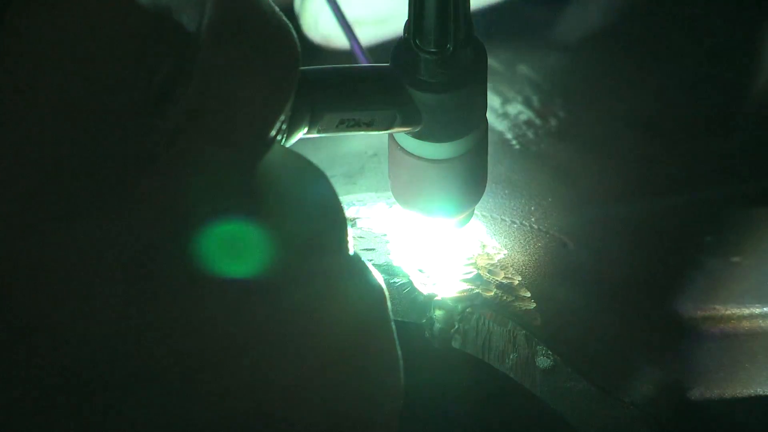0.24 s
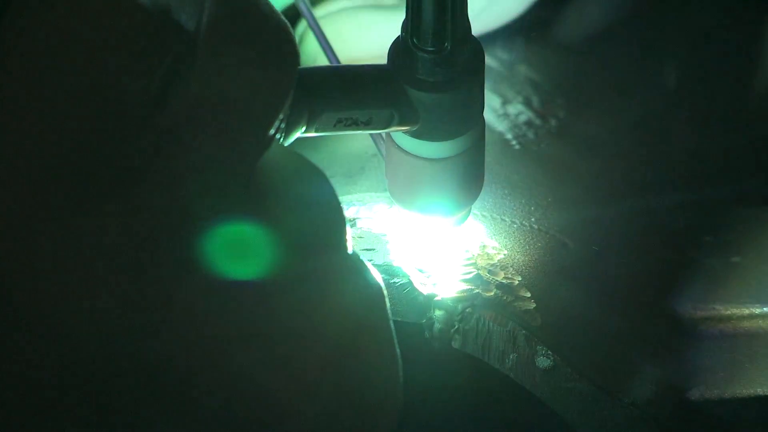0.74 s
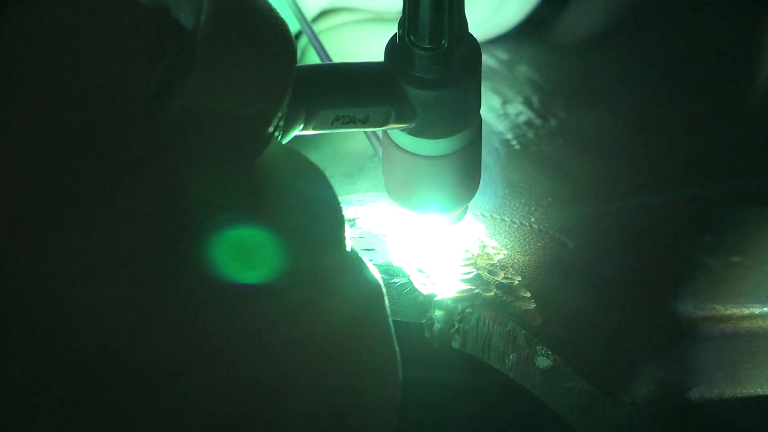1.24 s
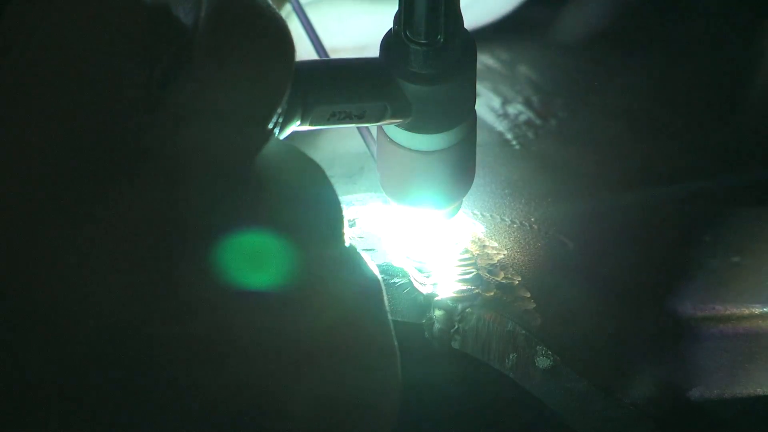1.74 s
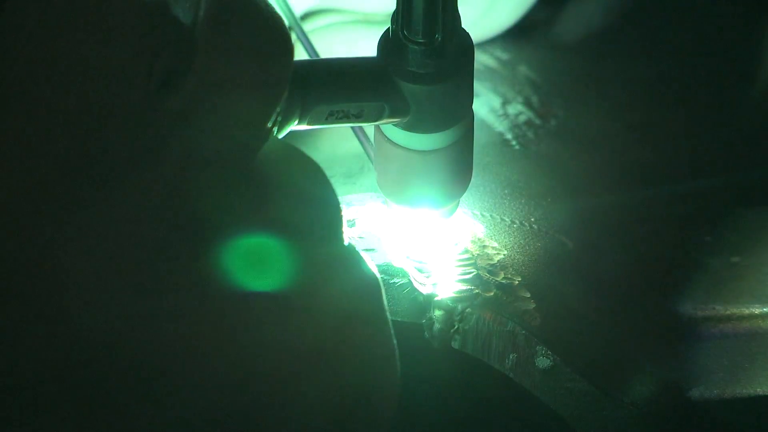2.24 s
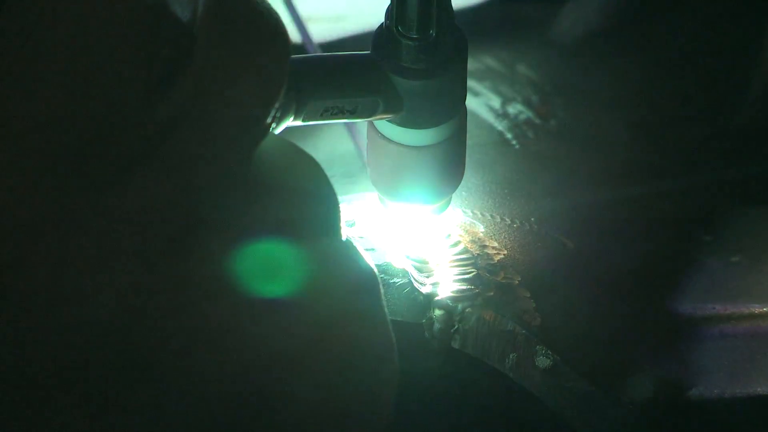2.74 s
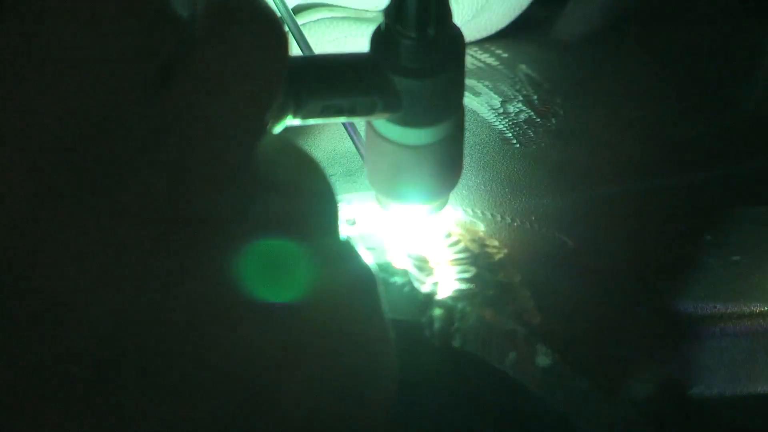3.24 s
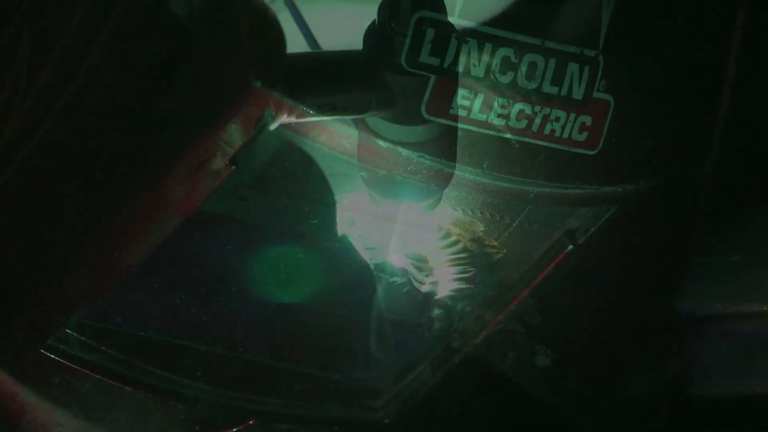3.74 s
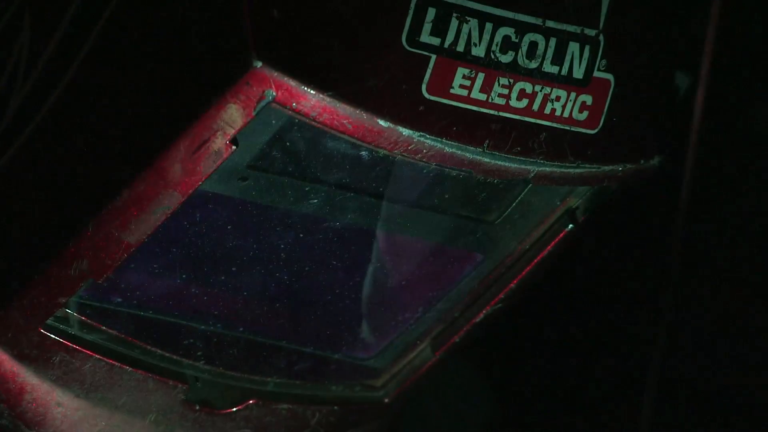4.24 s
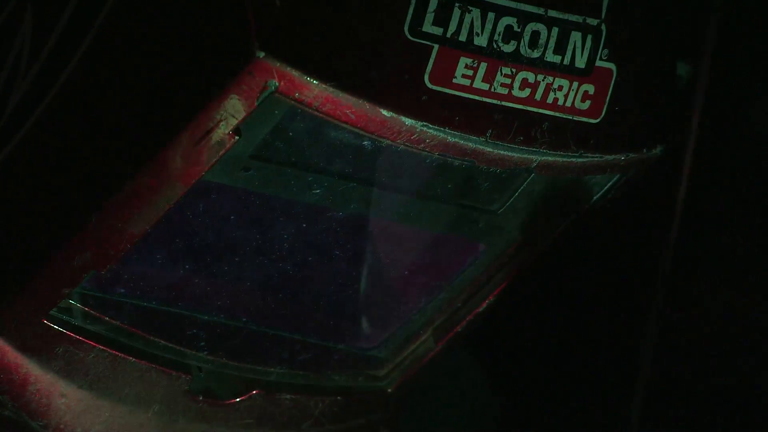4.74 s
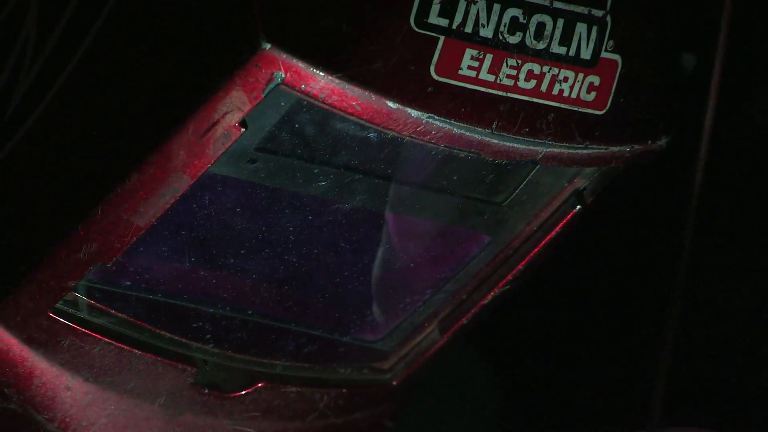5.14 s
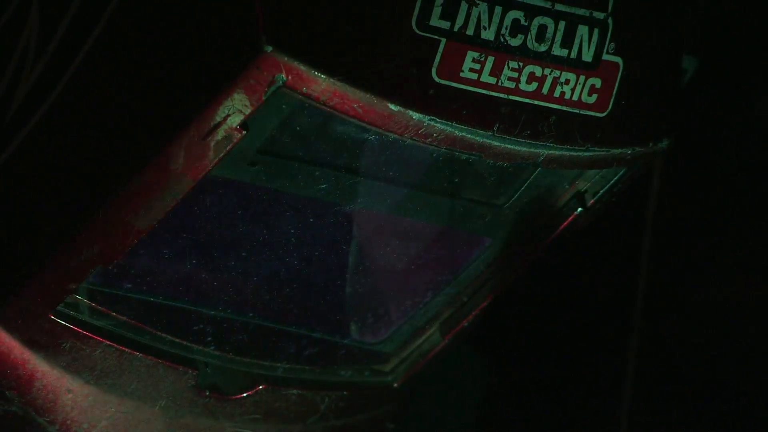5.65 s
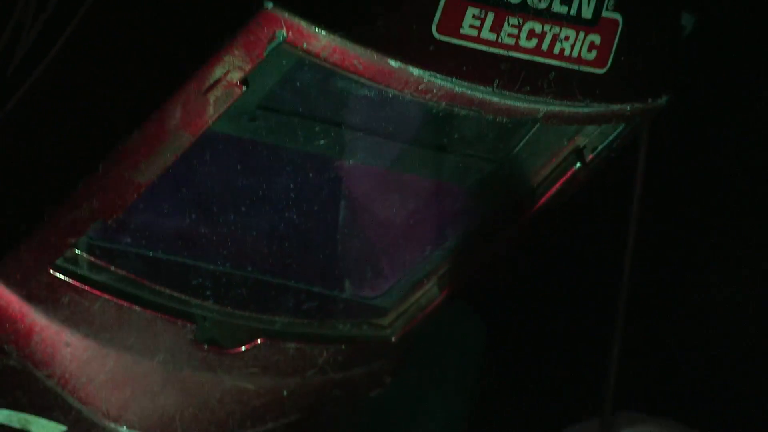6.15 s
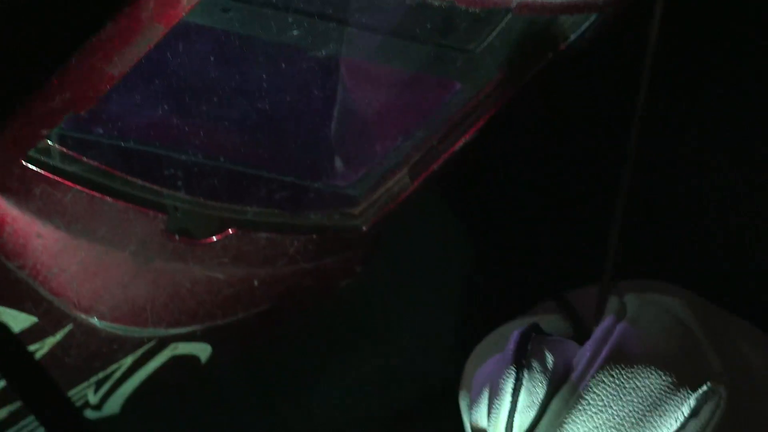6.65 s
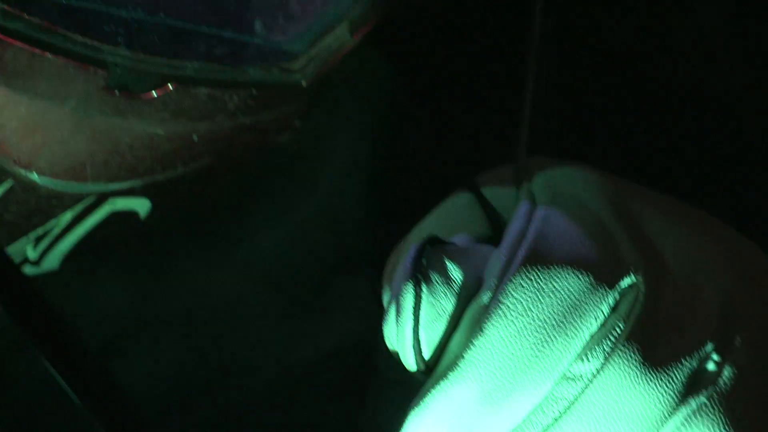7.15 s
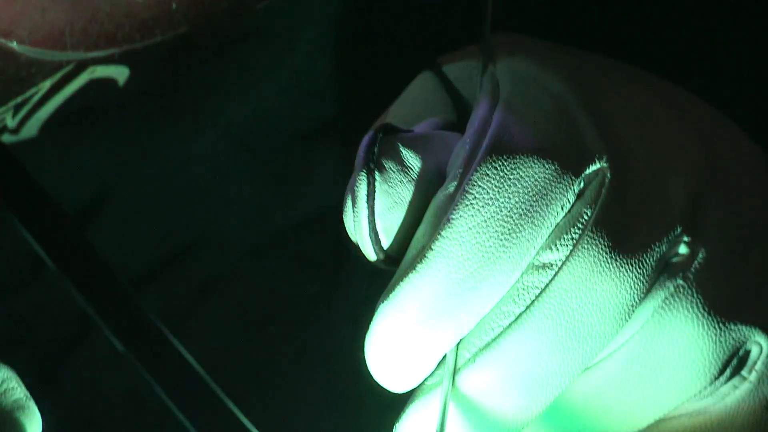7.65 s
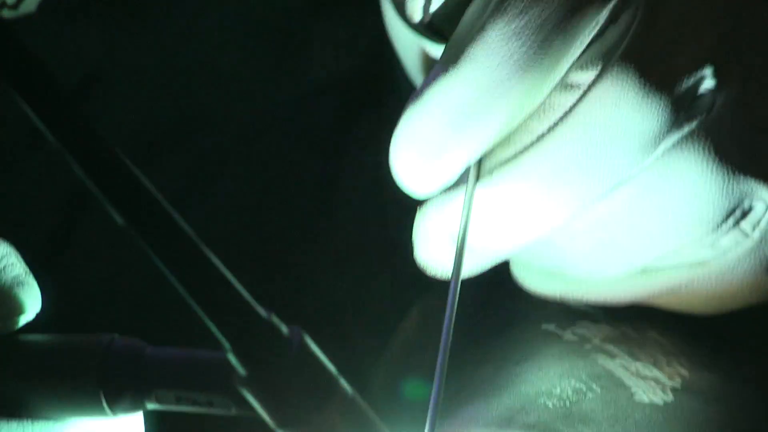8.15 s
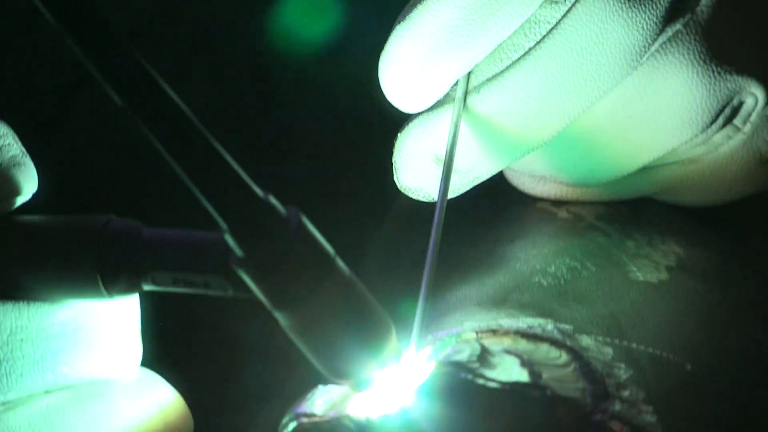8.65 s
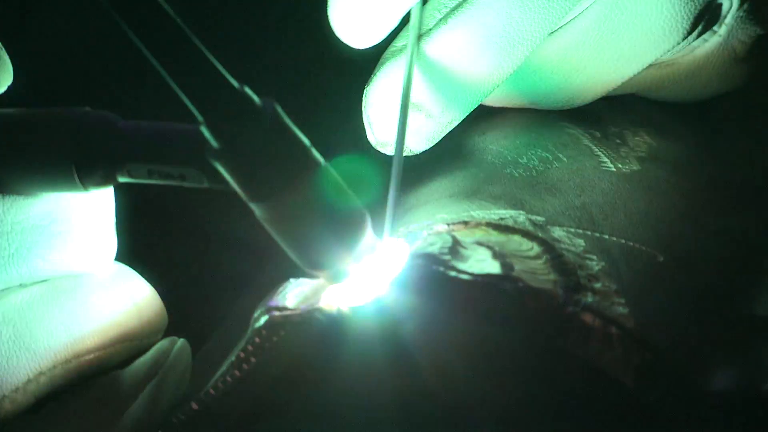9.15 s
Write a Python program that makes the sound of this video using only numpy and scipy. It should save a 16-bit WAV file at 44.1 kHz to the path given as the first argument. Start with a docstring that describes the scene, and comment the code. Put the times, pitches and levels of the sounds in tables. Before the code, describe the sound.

In a small dry workshop, a welding arc holds a constant low, raspy buzz with bright sizzle. Dull little pops sputter from the molten pool in irregular bouts. The close microphone seems to be beside the torch first, then blends smoothly to a place by the welder's helmet, where the buzz turns brighter and more uneven. Pops grow rougher towards the end.

```python
"""AC TIG arc in a workshop

An arc buzzes on a metal workpiece, heard beside the torch, then beside the welder's helmet in a crossfade.
Clicks at both polarity changes of every cycle, plus noise fizz, pass through echoes, resonances and registers.
Filtered pulses make the pool's dull pops: small puffs loosely follow the cycles, loud pops have listed times.
Shaped noise makes the air and the room tail; short decaying sines make soft bumps on the microphone's mount."""
import sys
import numpy as np
from scipy import signal
from scipy.fft import rfft, irfft, next_fast_len
from scipy.io import wavfile
from scipy.ndimage import map_coordinates

SR = 44100
rng = np.random.default_rng(int(sys.argv[2]) if len(sys.argv) > 2 else 0)


def inscribe(sig):
    """Save sig as 16-bit PCM at rate SR to the path in sys.argv[1].

    A 1-D sig is mono; a 2-D sig holds one channel per row.
    Samples are clipped to [-1, 1] before scaling.
    """
    pcm = np.round(np.clip(np.atleast_2d(sig).T, -1, 1) * 32767)
    wavfile.write(sys.argv[1], SR, pcm.astype(np.int16))


N = 414099
TIME = np.arange(N) / SR
GRID_HZ = np.maximum(np.fft.rfftfreq(8192, 1 / SR), 1)
ARC_HZ = 116.172


def from_db(db):
    """Decibels to gain."""
    return 10 ** (np.asarray(db) / 20)


def rms_one(x):
    """Scale to an rms of 1."""
    return x / np.sqrt(np.mean(x ** 2) + 1e-20)


def curves(rows, times):
    """Interpolate each column of a table at the given times."""
    s, *columns = np.transpose(rows)
    return [np.interp(times, s, column) for column in columns]


def spectrum_db(points):
    """Join (Hz, dB) points on a log-frequency axis."""
    hz, db = np.transpose(points)
    return np.interp(np.log(GRID_HZ), np.log(hz), db)


def butter(x, hz, kind, order):
    """Causal Butterworth low- or high-pass."""
    sos = signal.butter(order, min(hz, .45 * SR), kind, fs=SR, output="sos")
    return signal.sosfilt(sos, x + 1e-18)


def wander(times, per_s):
    """Smooth random curve through normal knots of spread 1, per_s knots a second."""
    knots = rng.standard_normal(1024)
    return map_coordinates(knots, [times * per_s], order=3, mode="wrap")


def swell(at_s, width_s):
    """Gaussian rise to 1 and back."""
    return np.exp(-((TIME - at_s) / width_s) ** 2)


def response(db):
    """Minimum-phase impulse response of a dB curve, with unit energy."""
    cepstrum = irfft(np.log(from_db(db)))
    half = len(cepstrum) // 2
    # fold the cepstrum to make it causal
    cepstrum[1:half] *= 2
    cepstrum[half + 1:] = 0
    impulse = irfft(np.exp(rfft(cepstrum)))[:half]
    return impulse / np.linalg.norm(impulse)


def through(x, impulse):
    """Convolve with an impulse response."""
    return signal.fftconvolve(x, impulse)[:N]


def clicks(times, sizes, size=N):
    """Sharp clicks, placed between samples by a windowed sinc."""
    at = np.asarray(times)[:, None] * SR
    taps = np.floor(at).astype(int) + np.arange(-5, 7)
    shape = np.sinc(taps - at) * np.sinc((taps - at) / 6)
    weights = shape * np.asarray(sizes)[:, None]
    inside = (taps >= 0) & (taps < size)
    return np.bincount(taps[inside], weights[inside], size)


def workshop_air():
    """Workshop air and shielding gas: steady coloured noise."""
    # Each row: frequency in Hz, relative density in dB per Hz.
    air_colour = [(20, -9), (50, -6.5), (90, -6.5), (250, -5), (1000, -5), (4000, -10), (16000, -16.5)]
    level_db = -45
    return from_db(level_db) * through(rng.standard_normal(N), response(spectrum_db(air_colour)))


def workshop(x):
    """Far walls return a faint, dull, diffuse tail: decaying noise as impulse response."""
    t60_s, room_db = .3, -21
    age = TIME[:SR // 2]
    decay = from_db(-60 * age / t60_s) * (age > .006)
    tail = butter(rng.standard_normal(len(age)) * decay, 7400, "low", order=1)
    return from_db(room_db) * through(x, tail / np.linalg.norm(tail))


def bumps(hz, t60_s):
    """Each soft bump rings the microphone's mount briefly as a decaying sine."""
    # Each row: start in seconds, starting amplitude of the ring in dB.
    mount_bumps = [(6.128, -46), (6.168, -44), (6.27, -48), (6.37, -45)]
    bump_s, bump_db = np.transpose(mount_bumps)
    age = TIME[:SR // 2]
    ring = np.sin(2 * np.pi * hz * age) * from_db(-60 * age / t60_s)
    return through(clicks(bump_s, from_db(bump_db)), ring)


def sputter(times):
    """Gain of the pool's puffs: each bout builds up, holds and dies away; 0 between bouts."""
    # Each row: bout start in seconds, end in seconds, puff gain in dB ahead of the place's own gain.
    bouts = [(0.213, 0.65, -43.5), (1.21, 1.535, -46), (1.55, 1.81, -43), (1.96, 2.04, -49),
             (2.507, 3.048, -44.5), (3.172, 3.41, -46.5), (3.623, 3.855, -42.5), (4.11, 4.673, -44),
             (4.86, 5.252, -38), (5.917, 6.27, -39.5), (6.412, 6.6, -39.5), (7.31, 7.653, -39),
             (7.88, 8.084, -39), (8.245, 8.364, -36.5), (8.846, 8.91, -33), (9.142, 9.282, -32)]
    edge_s = 0.054
    gain = 0
    for start, end, db in bouts:
        edge = np.minimum(times - start, end - times) / edge_s
        gain = gain + from_db(db) * np.clip(edge + .5, 0, 1)
    return gain


def unrest(times):
    """Restlessness of the pool: 0 when calm, 1 at the puff gain of a full bout, more in the hardest."""
    full_bout_db = -36.5
    return sputter(times) / from_db(full_bout_db)


def pool(cycles, colour, calm_db, sputter_db, loud_db, spread_db, outward, scatter_s):
    """Small puffs come about a millisecond into each cycle, at times in a hard run; loud pops at listed times."""
    # Each row: start in seconds, level over one cycle in dB ahead of loud_db and the dulling.
    loud_pops = [(0.015, -31), (0.23, -36), (0.566, -36), (1.219, -33), (1.289, -31), (1.461, -35),
                 (1.616, -35), (1.685, -34), (1.736, -34), (2.02, -35), (2.597, -35), (2.726, -35),
                 (2.778, -33), (2.872, -35), (2.907, -32), (3.027, -35), (3.243, -34), (3.388, -31),
                 (3.699, -35), (4.446, -31), (4.601, -33), (5.955, -32), (6.021, -32), (6.039, -31),
                 (6.125, -33), (6.219, -31), (6.417, -33), (7.339, -29), (7.528, -29), (7.614, -29),
                 (7.743, -29), (7.906, -31), (7.932, -30), (7.993, -30), (8.173, -30), (8.845, -31),
                 (8.871, -32), (9.284, -31)]
    runs_per_s = 45   # runs of two or three cycles
    repeat_gain = 0.17   # a loud pop comes again one cycle later
    count = len(cycles)
    runs = from_db(spread_db * np.tanh(wander(cycles, runs_per_s)))
    sizes = rms_one((outward + rng.standard_normal(count)) * runs)
    sizes = 3 * np.tanh(sizes / 3)
    sizes = sizes * np.hypot(from_db(calm_db), from_db(sputter_db) * sputter(cycles))
    puffs = clicks(cycles + 0.00093 + scatter_s * rng.standard_normal(count), sizes)
    pop_s, pop_db = np.transpose(loud_pops)
    pop_sizes = from_db(pop_db + loud_db)
    pops = clicks(pop_s, pop_sizes) + clicks(pop_s + 1 / ARC_HZ, repeat_gain * pop_sizes)
    dulled = butter(butter(puffs + pops, 2900, "low", order=2), 75, "high", order=2)
    # the root turns click size into rms over one cycle
    return through(dulled, response(spectrum_db(colour))) * np.sqrt(SR / ARC_HZ)


def snaps(cycles, reverse_s, reverse_gain, calm_flutter_db, bout_flutter_db):
    """Two snaps a cycle: a round one as the electrode turns positive, a thin one as it turns back."""
    root_drift_s, root_jitter_s_per_db = 1e-5, 3e-6
    fizz_decay_s, fizz_db = .0022, -16.5
    count = len(cycles)
    # strength spreads more while the pool is restless
    flutter_db = calm_flutter_db + bout_flutter_db * unrest(cycles)
    chance = 0.69 * wander(cycles, per_s=60) + 0.37 * rng.standard_normal((2, count))
    sizes = from_db(flutter_db * chance)
    # the arc root roams, so the second snap comes a little early or late
    late_s = root_drift_s * wander(cycles, per_s=2.054)
    late_s = late_s + root_jitter_s_per_db * flutter_db * rng.standard_normal(count)
    first = butter(clicks(cycles, sizes[0]), 7000, "low", order=1)
    second = clicks(cycles + reverse_s + late_s, reverse_gain * sizes[1])
    second = butter(second, 2500, "high", order=1)
    # oxide crackles away from the metal from the first snap on
    age = (TIME - cycles[0]) % (1 / ARC_HZ)
    fizz = butter(rng.standard_normal(N) * np.exp(-age / fizz_decay_s), 5800, "high", order=1)
    return -rms_one(first + second) + from_db(fizz_db) * rms_one(fizz)


def scatter(x, gain, size):
    """Bounces between two surfaces, size samples a round trip: an allpass spreads time, keeps colour."""
    loop = np.zeros(size + 1)
    loop[0], loop[-1] = 1, np.clip(gain, -.97, .97)
    return signal.lfilter(loop[::-1], loop, x)


def surroundings(x, colour, modes, echoes):
    """Short echoes and resonances of the work, gloves and helmet."""
    db = spectrum_db(colour)
    for hz, width_hz, gain_db in modes:
        db = db + gain_db / (1 + (2 * (GRID_HZ - hz) / width_hz) ** 2)
    delays_s, gains = np.transpose(echoes)
    echoed = x + through(x, clicks(delays_s, gains, size=512))
    return rms_one(butter(through(echoed, response(db)), 76, "high", order=2))


def glove(x, gain, delay_s, sway_s):
    """An echo off the moving hand, its delay swaying, makes the tone shift slowly."""
    delay = delay_s + sway_s * wander(TIME, per_s=1.747)
    return x + gain * map_coordinates(x, [(TIME - delay) * SR], order=3)


def bench(x, hand_echo_gain):
    """Longer bounces over the bench fill the pause between snaps; the welder's hand adds one more."""
    bounced = scatter(x, gain=0.95, size=113)
    return glove(bounced, hand_echo_gain, delay_s=0.000805, sway_s=.00006)


def play_buzz(x, registers, hum_db, boom_db):
    """The arc's force and the pool's unrest swell each register by its own share."""
    # Each row: time in seconds, force of the arc in dB, which rises and falls with its length.
    arc_force = [(0.0, -34), (0.13, -32.5), (1.31, -32), (1.44, -38), (1.67, -29.5), (2.14, -28),
                 (2.38, -34), (3.24, -29), (3.56, -36.5), (4.63, -32.5), (4.71, -34), (5.05, -29.5),
                 (5.36, -30), (5.7, -36.5), (5.73, -32.5), (5.88, -33), (5.93, -37), (6.49, -28.5),
                 (7.03, -31.5), (7.22, -34), (7.74, -31.5), (7.82, -33.5), (7.87, -31.5), (8.34, -29),
                 (9.07, -32), (9.26, -31.5), (9.34, -34), (9.39, -32)]
    # Edges in Hz between low hum, hum, hollow boom, growl, rasp, sizzle and top.
    edges_hz = (170, 405, 630, 1690, 3400, 11500)
    hz = np.fft.rfftfreq(2 * next_fast_len(N // 2 + 1), 1 / SR)
    whole = rfft(x, 2 * (len(hz) - 1))
    below = [0] + [1 / (1 + (hz / edge) ** 24) for edge in edges_hz] + [1]
    force_db, = curves(arc_force, TIME)
    swing_db = force_db - force_db.mean()
    restless = unrest(TIME)
    swells_db = (0, hum_db, boom_db, 0, 0, 0, 0)
    out = 0
    for low, high, (level_db, share, bout_db), swell_db in zip(below, below[1:], registers, swells_db):
        band = rms_one(irfft(whole * (high - low))[:N])
        out = out + band * from_db(level_db + share * swing_db + bout_db * restless + swell_db)
    return out


def beside_torch(beat):
    """Arc and pool from the torch; hum and boom dip briefly."""
    # Each row: frequency in Hz, relative level of the snaps in dB.
    snap_colour = [(116, -14), (232, -15.5), (400, 4.5), (900, -15), (1400, -12), (4000, -11.5),
                   (6000, -28), (9000, -15), (13000, -31), (16000, -33)]
    # Each row: resonance or dip in Hz, width in Hz, gain in dB.
    modes = [(574, 116, -10.2), (1055, 94, -9.0), (1159, 93, 5.9), (1393, 96, -15.0), (1558, 160, 10.4),
             (1732, 93, -6.7), (2248, 147, -13.2), (3841, 98, -10.5), (4374, 241, 8.0), (4868, 96, -7.5),
             (5536, 215, -6.9), (5696, 103, 6.5), (5929, 140, 4.0), (6510, 192, -9.6), (6962, 440, 5.5),
             (7536, 100, -7.0), (9125, 253, 5.7), (9403, 184, -6.3), (9924, 213, 8.3), (10564, 241, -5.9),
             (12337, 261, 5.9)]
    # Each row: echo delay in seconds, linear gain.
    echoes = [(0.000158, 0.5), (0.000851, 0.19), (0.002198, -0.15), (0.002823, -0.08)]
    # Each row: frequency in Hz, relative level of a pop in dB.
    pop_colour = [(60, -25.5), (200, -12), (290, -7.5), (390, 3.5), (460, -4.5), (570, -7), (720, 4.5),
                  (860, 0.5), (1030, -17.5), (1200, 0.5), (1400, -16.5), (1800, -9.5), (2500, -18.5),
                  (3300, -24.5)]
    # Each row, low hum to top: base level in dB, share of the arc's swing, dB added by a full bout.
    registers = [(-49.5, .1, 0.5), (-39, 0.16, 4), (-41, 0.21, 1.2), (-38.5, 0.2, 5.5), (-41, 0.21, 4),
                 (-35, 0.59, 1.5), (-46, 1, -2.5)]
    cycles = beat + .00517
    arc = snaps(cycles, reverse_s=.001711, reverse_gain=1.2, calm_flutter_db=0.52, bout_flutter_db=1.2)
    arc = surroundings(scatter(arc, gain=.74, size=13), snap_colour, modes, echoes)
    dip_db = -8.5 * swell(at_s=3.7, width_s=0.37)
    buzz = play_buzz(bench(arc, hand_echo_gain=.2), registers, hum_db=dip_db, boom_db=dip_db)
    return buzz + pool(cycles, pop_colour, calm_db=-51, sputter_db=2.5, loud_db=2.0,
                       spread_db=10.5, outward=1.0, scatter_s=0.0002)


def beside_helmet(beat):
    """Arc and pool from the helmet; the hollow boom swells once."""
    # Each row: frequency in Hz, relative level of the snaps in dB.
    snap_colour = [(116.0, -9), (232.0, -15), (400.0, 23.5), (900.0, -15), (1400.0, -9), (4000.0, -8.5),
                   (6000.0, -20), (9000.0, -12), (13000.0, -14.5), (16000.0, -26)]
    # Each row: resonance or dip in Hz, width in Hz, gain in dB.
    modes = [(406, 114, -7.1), (588, 146, -9.1), (1544, 137, 13.2), (2102, 97, 3.3), (2404, 117, 3.8),
             (3154, 333, -10.5), (3373, 104, 5.5), (3476, 105, -3.2), (4337, 198, 3.5), (4861, 163, -8.2),
             (5033, 135, 12.7), (5691, 93, 3.9), (6358, 150, 3.8), (6577, 194, -4.2), (6968, 90, -6.8),
             (9697, 325, 5.9), (10110, 356, -5.7), (11159, 271, -8.7), (11751, 139, -7.7),
             (12159, 181, 6.0), (12388, 242, -6.3)]
    # Each row: echo delay in seconds, linear gain.
    echoes = [(0.000423, -0.12), (0.000582, -0.14), (0.001762, 0.2), (0.002422, 0.09)]
    # Each row: frequency in Hz, relative level of a pop in dB.
    pop_colour = [(60.0, -20.5), (200.0, -4), (290.0, -9.5), (390.0, 7), (450.0, 0), (570.0, -14),
                  (720.0, 3.5), (860.0, -5.5), (1030.0, -21.5), (1200.0, -6.5), (1400.0, -9.5),
                  (1800.0, -9.5), (2500.0, -11.5), (3300.0, -37.5)]
    # Each row, low hum to top: base level in dB, share of the arc's swing, dB added by a full bout.
    registers = [(-57.5, 0.78, 2.5), (-42.5, 0.98, 4), (-41, 0.34, 2.5), (-40.5, 0.96, 2.5),
                 (-37.5, 1.15, 1.3), (-34, 0.95, 1), (-39.6, 0.46, -0.5)]
    cycles = beat + .00362
    arc = snaps(cycles, reverse_s=.001721, reverse_gain=0.82, calm_flutter_db=0.98, bout_flutter_db=.8)
    arc = surroundings(scatter(arc, gain=.66, size=11), snap_colour, modes, echoes)
    boom_db = 10.5 * swell(at_s=4.2, width_s=0.44)
    buzz = play_buzz(bench(arc, hand_echo_gain=.12), registers, hum_db=0, boom_db=boom_db)
    return buzz + pool(cycles, pop_colour, calm_db=-42.5, sputter_db=-0.5, loud_db=-0.5,
                       spread_db=4.5, outward=0.22, scatter_s=0.00031)


def scene():
    """The same arc from two places, one fading into the other, over the workshop air."""
    fade_start_s, fade_end_s = 3.43, 4.27
    beat = np.arange(int(N / SR * ARC_HZ) + 1) / ARC_HZ
    turn = np.interp(TIME, (fade_start_s, fade_end_s), (0, np.pi / 2))
    arc = np.cos(turn) * beside_torch(beat) + np.sin(turn) * beside_helmet(beat)
    return (arc + workshop(arc) + workshop_air() + bumps(hz=49, t60_s=0.25))[None]


def record(dry):
    """Steep elliptic low-pass cuts the top."""
    cutoff_hz = 15800
    sos = signal.ellip(10, .1, 80, cutoff_hz, fs=SR, output="sos")
    return signal.sosfilt(sos, dry)


dry = scene()
out = record(dry)
inscribe(out)
```